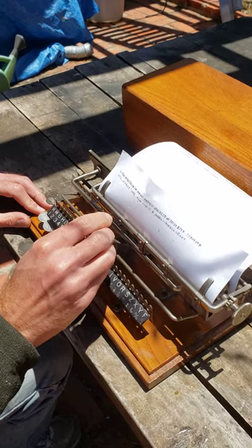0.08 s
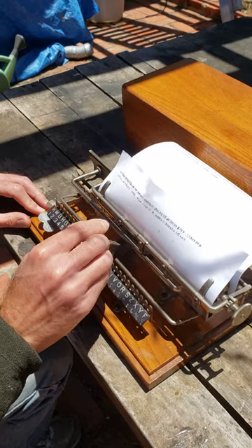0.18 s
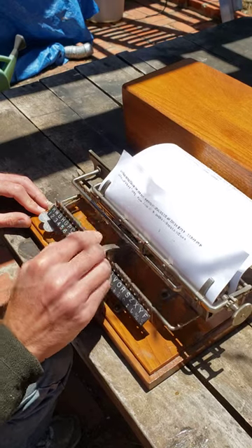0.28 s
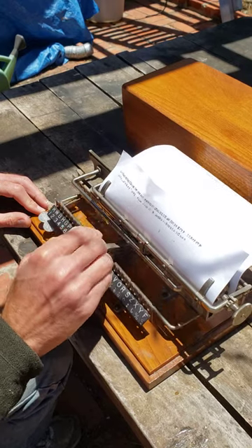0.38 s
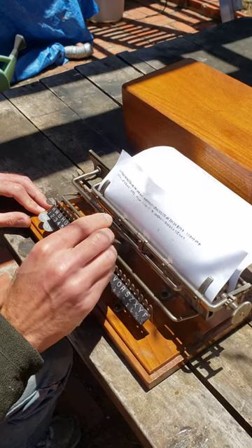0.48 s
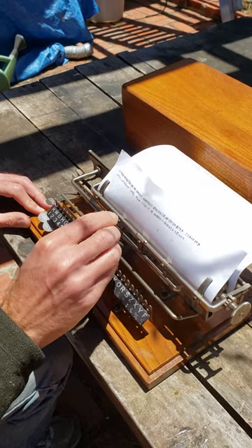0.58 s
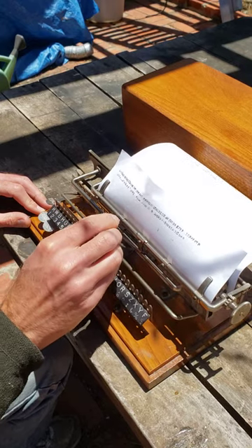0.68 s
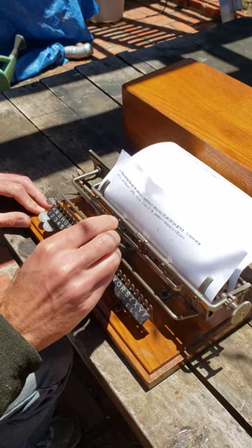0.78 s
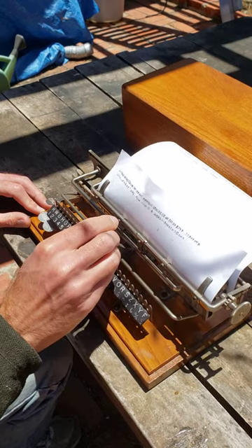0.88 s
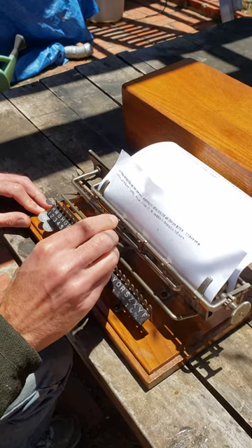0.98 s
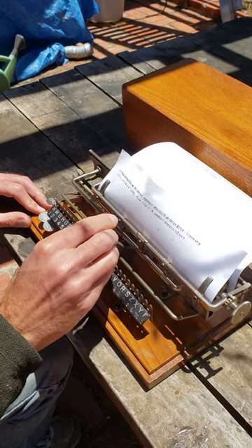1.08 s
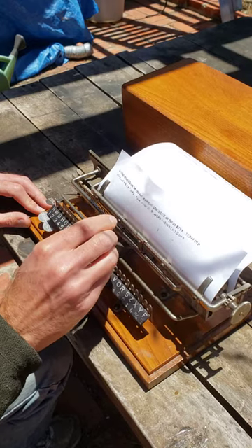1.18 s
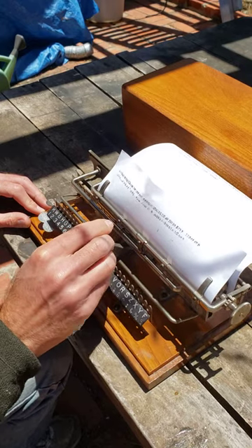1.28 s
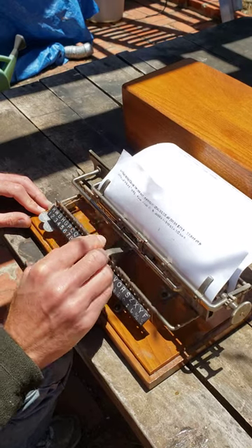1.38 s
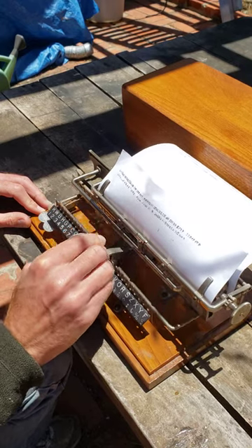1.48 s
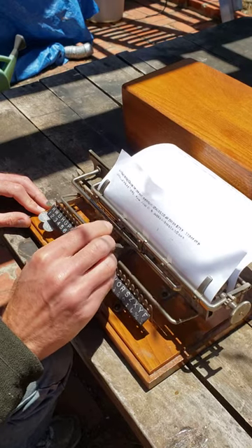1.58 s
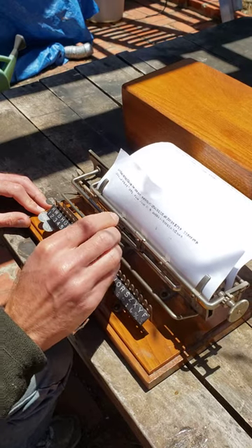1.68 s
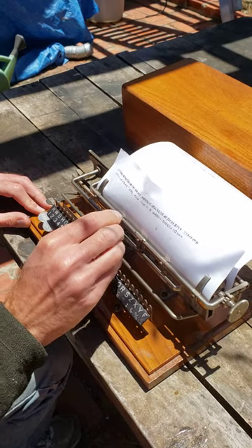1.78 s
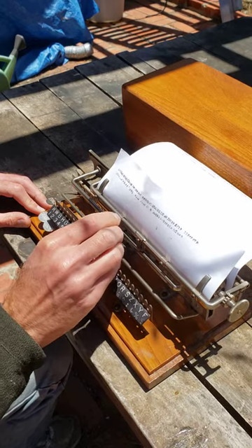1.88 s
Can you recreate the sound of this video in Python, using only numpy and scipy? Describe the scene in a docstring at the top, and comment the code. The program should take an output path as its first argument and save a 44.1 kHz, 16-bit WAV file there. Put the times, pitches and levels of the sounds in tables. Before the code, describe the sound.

Old index typewriter prints two characters, each a metallic lever clatter then a sharp snap

```python
"""Outdoors, on a wooden board: an old index typewriter prints two characters close to a two-port microphone.
In each stroke levers rattle down, the key bottoms out, the lever scrapes back and the escapement snaps.
Bursts of small contacts strike the ringing modes of frame and board; the pawl rings as it lets go and stops.
Thin steel rings on as decaying tones, and a dying noise tail follows the blows.
Shaped noise makes the distant rumble and hiss; a wavering sine hums underneath."""
import sys
import numpy as np
from scipy import signal
from scipy.fft import rfft, irfft
from scipy.io import wavfile
from scipy.ndimage import uniform_filter1d

SR = 44100
rng = np.random.default_rng(int(sys.argv[2]) if len(sys.argv) > 2 else 0)


def to_wav(s):
    """Save 16-bit WAV."""
    ch = np.atleast_2d(s).T  # columns
    pcm = np.round(np.clip(ch, -1, 1) * 32767)  # PCM
    wavfile.write(sys.argv[1], SR, pcm.astype(np.int16))


def invert_db(level):
    """Linear amplitude ratio for a level in decibels (20 dB per decade), elementwise."""
    return 10 ** (np.asarray(level, dtype=float) / 20)


N = 83790  # length in samples

# Colour of the distant outdoor air, relative levels: pitch_hz, level_db
AIR_COLOUR = [(24, -37), (40, 2), (85, -5), (175, -14), (219, -19.5), (420, -25.5), (596, -35),
              (710, -29.5), (1110, -40.5), (1700, -41.5), (2030, -49.5), (2360, -44.5), (2880, -50.5),
              (4880, -53.5), (5810, -49.5), (8450, -62.5), (15800, -63)]
# Likeness of the air at the two ports: pitch_hz, likeness (1 = same)
AIR_LIKENESS = [(60, 0.9), (180, 1), (550, 1), (1650, 0.073), (4970, 0.09), (15000, 0.043)]
# Air, left port over right: pitch_hz, level_db
AIR_LEAN = [(60, 0.6), (240, 7.7), (950, 10), (3770, 15), (15000, 11)]
# Keys bottoming out and shaking the table: start_s, level_db, length_s
KEY_THUDS = [(0.241, -40.5, 0.0034), (0.271, -26, 0.0055), (1.365, -42, 0.0036), (1.407, -24.5, .008),
             (1.426, -33, 0.005)]
# Low modes of the table, relative levels: pitch_hz, level_db, t60_s
TABLE_MODES = [(81, -2.5, 0.44), (134, -0.5, .1), (161, -1.5, 0.16), (199.6, 0.5, 0.18), (268, 4.5, 0.03)]
# Early decay of the shivering machine and table: pitch_hz, t60_s
SHIVER_DECAY = [(300, 0.36), (1000, 0.19), (2500, 0.16), (4000, 0.096), (8000, 0.09), (15000, 0.18)]
# Slower, faint part of the shiver: pitch_hz, level_db
SHIVER_REMNANT = [(300, -31.5), (3000, -26.5), (6500, -29.5), (15000, -43)]
# Thin steel strips set ringing: start_s, pitch_hz, level_db, t60_s
STEEL_RINGS = [(.0977, 6460, -57, 0.036), (.7781, 6100, -49.5, 0.034), (.463, 2680, -39, 0.13),
               (1.26, 1650, -61, 0.087), (.46, 5965, -48, 0.98), (.46, 6029, -51, 0.87),
               (.46, 6110, -52.5, 0.35), (.46, 5846, -56.5, 1.33), (1.404, 3488, -62, 1.5),
               (1.5975, 3488, -66, 2.3), (1.5975, 5965, -54, 0.7), (1.5975, 6029, -56.5, 0.6),
               (1.5975, 6110, -61, 0.44), (1.664, 2140, -51.5, 0.038)]
# Spray from tiny parts, relative levels: pitch_hz, level_db
FIZZ_COLOUR = [(5000, -56.5), (8500, -1), (10500, 6), (13500, 11), (15000, 2), (15700, 7), (17000, -1.5)]
# Levers touching and chattering: start_s, frame_level_db, length_s, board_level_db, fizz_level_db
LEVER_RATTLES = [(.0977, -46, 0.0045, -64.5, -45.5), (.2184, -20, 0.0043, -54, -30.5),
                 (.228, -35, 0.0052, -54, -47.5), (.2376, -12.5, 0.0054, -39.5, -12.5),
                 (0.2435, -26.5, 0.018, -40.5, -33.5), (0.2698, -13.5, 0.0041, -32, -33),
                 (.275, -18.5, 0.0036, -30, -14.5), (.296, -55, 0.011, -35, -58),
                 (0.309, -46.5, 0.0053, -37.5, -58.5), (.329, -39.5, 0.0033, -53, -68.5),
                 (.407, -31, 0.0016, -49, -28.5), (.4105, -33.5, 0.0012, -38, -38),
                 (.4127, -26, 0.00042, -38.5, -29.5), (.415, -25.5, 0.0012, -43.5, -42.5),
                 (.4205, -29.5, 0.0019, -45, -48), (.424, -35, 0.00074, -46.5, -46.5),
                 (.428, -21, 0.006, -39, -30), (.7781, -48, 0.002, -73, -57.5),
                 (1.26, -42.5, 0.0031, -65, -37), (1.3044, -42, 0.025, -44.5, -46.5),
                 (1.353, -42.5, 0.013, -40, -59), (1.3635, -13.5, 0.0065, -33, -14.5),
                 (1.387, -33, 0.017, -44.5, -40.5), (1.4033, -10.5, 0.0031, -31, -23),
                 (1.409, -22.5, 0.0053, -37.5, -18.5), (1.424, -40, 0.011, -35.5, -71),
                 (1.447, -40, .01, -44, -66.5), (1.534, -34.5, 0.0074, -46.5, -28.5),
                 (1.5405, -26.5, 0.00095, -38.5, -41.5), (1.548, -34.5, 0.0045, -47.5, -50),
                 (1.554, -28, 0.0023, -41.5, -28.5), (1.5585, -39.5, 0.0044, -45.5, -40.5),
                 (1.575, -44, 0.054, -41, -63), (1.714, -51, 0.0044, -68.5, -48)]
# Modes of the machine's frame, relative levels: pitch_hz, level_db, t60_s
FRAME_MODES = [(1080, -14, 0.011), (1670, -10.5, 0.009), (2210, -13, 0.013), (2680, -1.5, 0.0053),
               (3145, -0.5, 0.0048), (3747, -9, 0.0086), (4543, -4, 0.0036), (5202, -6.5, 0.0041),
               (6100, -9, 0.009), (8040, -11, 0.002)]
# Modes of the wooden board, relative levels: pitch_hz, level_db, t60_s
BOARD_MODES = [(301, -1.5, 0.019), (408, -4.5, 0.023), (520, -6, 0.021), (648, -6.5, 0.04),
               (852, -6.5, 0.0251)]
# Escapement, pawl then stop: start_s, level_db, stop_after_s, stop_over_release_db, fizz_level_db
ESCAPEMENT_SNAPS = [(.4596, -5, .0016, 2.5, -4.5), (1.5975, -6.5, 0.0013, -1, -7.5)]
# Modes of the small pawl, relative levels: pitch_hz, level_db, t60_s
PAWL_MODES = [(1336, -22, 0.023), (2000, -12.5, 0.013), (2511, 4.5, 0.0083), (2642, 8.5, 0.0084),
              (3030, 6, 0.0046), (3390, -0.5, .01), (3980, -9.5, 0.012), (4290, -10.5, 0.011),
              (4793, -8.5, 0.007), (6000, -10, 0.022), (6400, -10, 0.017), (8100, -12, 0.015),
              (3270, -0.5, 0.0054), (1650, -17.5, 0.013)]
# The machine, left port over right: pitch_hz, level_db
PORT_LEAN = [(60, 3), (150, 3.5), (380, 5), (950, 5.5), (2380, 3.5), (4500, 4), (8000, 4.5), (15000, 8)]
# Phase by which the left port leads for the machine: pitch_hz, lead_rad
LEFT_PORT_LEAD = [(30, 0), (500, .1), (1000, .3), (2500, .6), (4700, 1.3), (6500, 2.9), (12000, 5.8),
                  (16000, 7)]

RISE_S = .0004  # a run of contacts builds up to its first firm touch
FIRST_JOLT = .25  # share of the ring time that passes into the machine


def evened(x):
    """Scales a signal to unit rms."""
    return x / np.sqrt(np.mean(x ** 2) + 1e-20)


def read(points, hz):
    """Reads a table value on a log-frequency axis."""
    pitch_hz, value = np.transpose(points)
    return np.interp(np.log(hz + 1), np.log(pitch_hz + 1), value)


def add(mix, start_s, sound):
    """Mixes a sound in at start_s, cut at the end of the mix."""
    part = mix[round(start_s * SR):][:len(sound)]
    part += sound[:len(part)]


def struck(modes, size=6000, share=1):
    """Decaying modes after one tap, neighbours in opposite sense, peak 1; share scales the ring time."""
    t = np.arange(size) / SR
    ring = np.zeros(size)
    for k, (pitch_hz, level_db, t60_s) in enumerate(modes):
        decay = invert_db(level_db - 60 * t / t60_s / share)
        ring += (-1) ** k * decay * np.sin(2 * np.pi * pitch_hz * t)
    return ring / abs(ring).max()


def chatter(length_s):
    """A quick run of uneven contacts, random in time, size and sign, that dies away; energy 1."""
    contacts_per_s, spread_db = 14000, 3
    t = np.arange(2048) / SR
    chance, size, sign = rng.random((3, 2048))
    sizes = invert_db(-spread_db * np.log(size + 0.0026)) * np.sign(sign - .5)
    hits = (chance < contacts_per_s / SR) * sizes
    hits[round(RISE_S * SR)] = 2  # the first firm touch
    hits = hits * np.minimum((t + 1e-4) / RISE_S, 1) * np.exp(-t / length_s)
    return hits / np.linalg.norm(hits)


def air():
    """Distant rumble and hiss: coloured noise, partly alike at the ports, with drifting patches and a swell."""
    level_db, patch_db, swell_db = -45.5, 1.2, .4  # overall rms, then rms of the two drifts
    lag_s = .0003  # the right port hears the shared part later
    frames, hz = N // 256 + 5, np.fft.rfftfreq(1024, 1 / SR)
    a, b, c, d, patches = rng.standard_normal((frames, 513, 5)).T
    patches = uniform_filter1d(patches, size=8, axis=0)
    patches = evened(uniform_filter1d(patches, size=14, axis=1))
    swell = evened(uniform_filter1d(rng.standard_normal(frames), size=40))
    same = np.clip(read(AIR_LIKENESS, hz), -1, 1)[:, None]
    lean = read(AIR_LEAN, hz)[:, None] / 2  # half to each port
    left = a + 1j * b
    right = same * left + np.sqrt(1 - same ** 2) * (c + 1j * d)
    right = right * np.exp(-2j * np.pi * hz * lag_s)[:, None]
    z = np.array([left * invert_db(lean), right * invert_db(-lean)])
    z *= invert_db(read(AIR_COLOUR, hz)[:, None] + patch_db * patches + swell_db * swell)
    noise = signal.istft(z, nperseg=1024, noverlap=768)[1][:, :N]
    return invert_db(level_db) * evened(noise)


def hum():
    """A low sine whose level and pitch waver slowly."""
    pitch_hz, level_db = 64.7, -53  # middle values
    waver = evened(uniform_filter1d(rng.standard_normal(N), size=3000))
    phase = 2 * np.pi * np.cumsum(pitch_hz + 0.5 * waver[::-1]) / SR
    return invert_db(level_db + 5.5 * waver) * np.sin(phase)


def shiver(jolts):
    """Machine and table shiver after a blow: dense noise tail, own at each port, each band at its own speed."""
    early_db, late_stretch = -8, 3.8  # the remnant dies late_stretch times slower
    hz, t, z = signal.stft(rng.standard_normal((2, SR // 2)), SR, nperseg=128)
    fall_db = 60 * t / read(SHIVER_DECAY, hz)[:, None]
    early = invert_db(early_db - fall_db)
    late = invert_db(read(SHIVER_REMNANT, hz)[:, None] - fall_db / late_stretch)
    tail = signal.istft(z * (early + late), SR, nperseg=128)[1][:, :SR // 2]
    tail = tail * np.minimum(np.arange(SR // 2) / 130, 1) / 30  # soft start, then overall scale
    return signal.fftconvolve(jolts[None], tail, axes=1)[:, :N]


def rings():
    """Thin steel strips: long faint tones, each one decaying mode."""
    out = np.zeros(N)
    for start_s, pitch_hz, level_db, t60_s in STEEL_RINGS:
        add(out, start_s, invert_db(level_db) * struck([(pitch_hz, 0, t60_s)], size=40000))
    return out


def thuds():
    """Keys bottom out: soft pushes into the low modes of the table."""
    push = np.zeros(N)
    for start_s, level_db, length_s in KEY_THUDS:
        bump = np.hanning(round(length_s * SR))
        add(push, start_s, invert_db(level_db) * bump / bump.sum())
    return signal.oaconvolve(push, struck(TABLE_MODES))[:N]


def fizz(drive):
    """Bright spray of tiny parts: contacts through a causal treble colour."""
    hz = np.linspace(0, SR / 2, 129)
    # minimum_phase halves the dB, hence the doubled colour
    squared = signal.firwin2(255, hz, invert_db(2 * read(FIZZ_COLOUR, hz)), fs=SR)
    taps = signal.minimum_phase(squared)
    return signal.oaconvolve(drive, taps / abs(taps).max())[:N]


def rattles():
    """Lever chatter drives frame, board and tiny parts; returns the sound and its jolt to the machine."""
    detune, uneven_db = .015, 1.5  # rms spread: each lever loads the frame differently
    frame = np.zeros((2, N))  # sound, jolt
    board, bright = np.zeros((2, N))
    for start_s, frame_db, length_s, board_db, fizz_db in LEVER_RATTLES:
        touch = invert_db(frame_db) * chatter(length_s)
        load = rng.standard_normal((len(FRAME_MODES), 2))
        modes = [(pitch_hz * (1 + detune * a), level_db + uneven_db * b, t60_s)
                 for (pitch_hz, level_db, t60_s), (a, b) in zip(FRAME_MODES, load)]
        for row, share in zip(frame, (1, FIRST_JOLT)):
            ring = struck(modes, size=1500, share=share)
            add(row, start_s, signal.oaconvolve(touch, ring) / np.sqrt(share))
        add(board, start_s, invert_db(board_db) * chatter(length_s))
        add(bright, start_s, invert_db(fizz_db) * chatter(length_s))
    rest = signal.oaconvolve(board, struck(BOARD_MODES))[:N] + fizz(bright)
    return frame + rest


def snaps():
    """The pawl lets go and hits its stop; too small to radiate bass. Returns sound and jolt."""
    release_share = 0.36  # the pawl still drags as it lets go: shorter ring, broad crack
    jolt_db, fizz_length_s, low_cut_hz = 1.5, .0025, 1300
    blow, jolt, bright = np.zeros((3, N))
    for start_s, level_db, after_s, stop_db, fizz_db in ESCAPEMENT_SNAPS:
        add(blow, start_s, invert_db(level_db) * struck(PAWL_MODES, share=release_share))
        add(blow, start_s + after_s, invert_db(level_db + stop_db) * struck(PAWL_MODES))
        push = struck(PAWL_MODES, share=FIRST_JOLT) / np.sqrt(FIRST_JOLT)
        add(jolt, start_s, invert_db(level_db + jolt_db) * push)
        add(bright, start_s - RISE_S / 2, invert_db(fizz_db) * chatter(fizz_length_s))
    thin = signal.butter(4, low_cut_hz, "high", fs=SR, output="sos")
    return signal.sosfilt(thin, [blow, jolt]) + fizz(bright)


def scene():
    """The machine stands close, left of the microphone: louder and earlier at the left port."""
    scatter_rad_per_khz = .12  # hands and case scramble the path to the far port
    blows, jolts = rattles() + snaps()
    hz = np.fft.rfftfreq(N, 1 / SR)
    wander = evened(uniform_filter1d(rng.standard_normal(len(hz)), size=3000))
    lag_rad = read(LEFT_PORT_LEAD, hz) + scatter_rad_per_khz * hz / 1000 * wander
    paths = np.array([hz ** 0, np.exp(-1j * lag_rad)])  # left, right
    direct = rfft(blows + rings() + thuds()) * paths
    lean = read(PORT_LEAN, hz) / 2  # half to each port
    machine = (direct + rfft(shiver(jolts))) * invert_db(np.array([lean, -lean]))
    return irfft(machine, N) + air() + hum()


def band_limit(x):
    """A steep low-pass at the top of the band."""
    return signal.sosfilt(signal.butter(12, 17150, fs=SR, output="sos"), x)


def record(dry):
    """The microphone's band limits: bass below 47 Hz and treble above 16 kHz fall away."""
    low = signal.butter(4, 47, "high", fs=SR, output="sos")
    high = signal.cheby1(10, .5, 16000, fs=SR, output="sos")
    mix = signal.sosfilt(np.vstack([low, high]), dry)
    return band_limit(mix)


dry = scene()
out = record(dry)
to_wav(out)
```